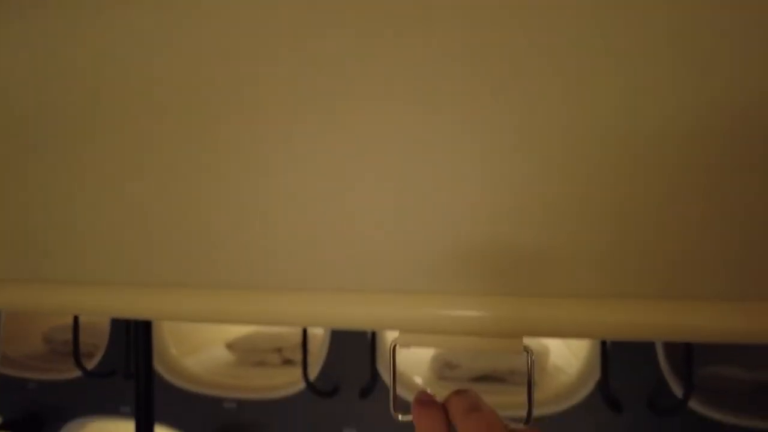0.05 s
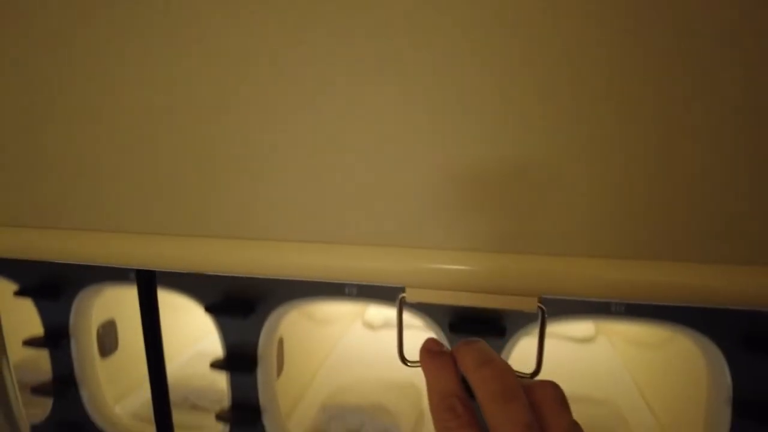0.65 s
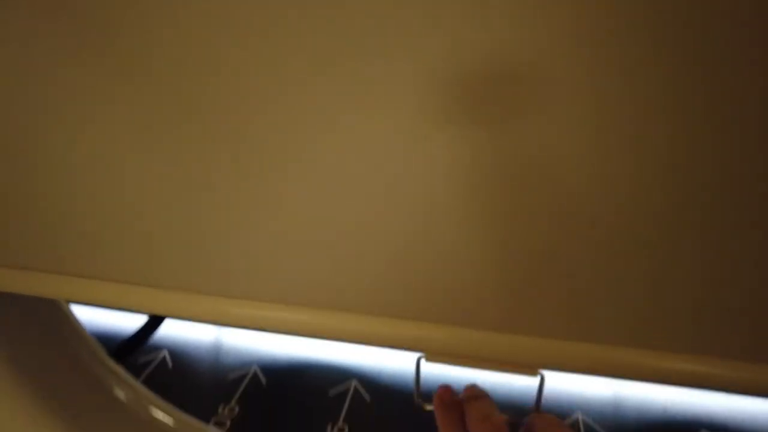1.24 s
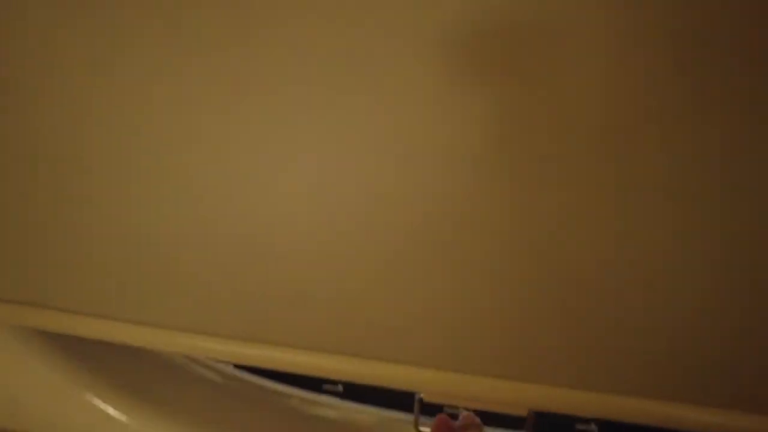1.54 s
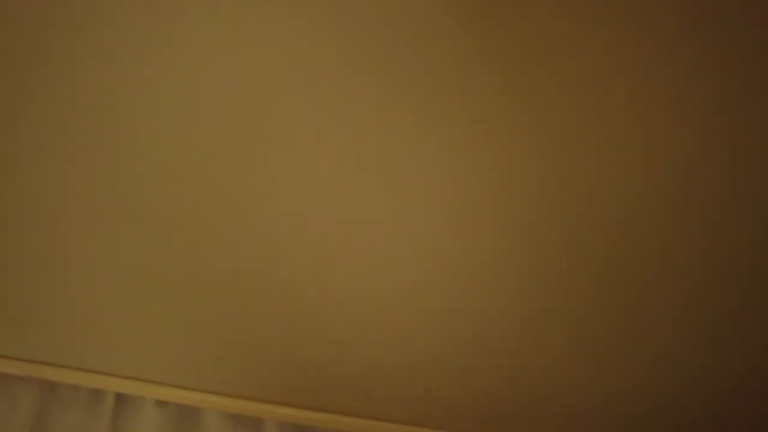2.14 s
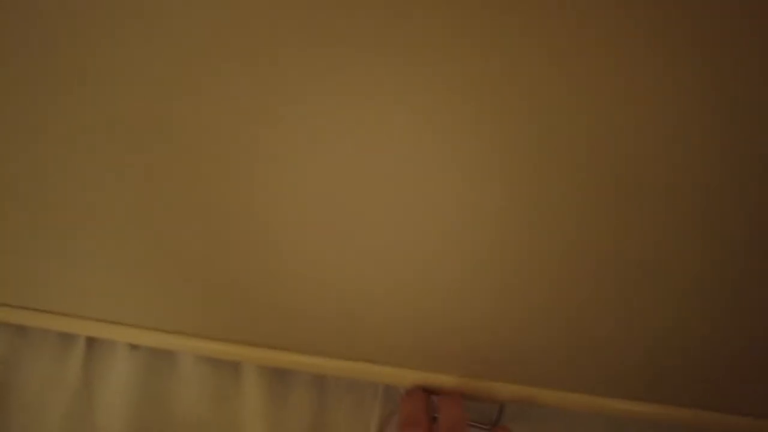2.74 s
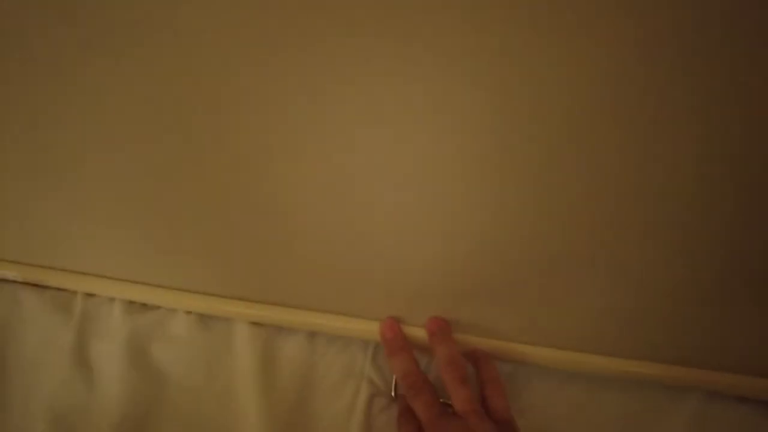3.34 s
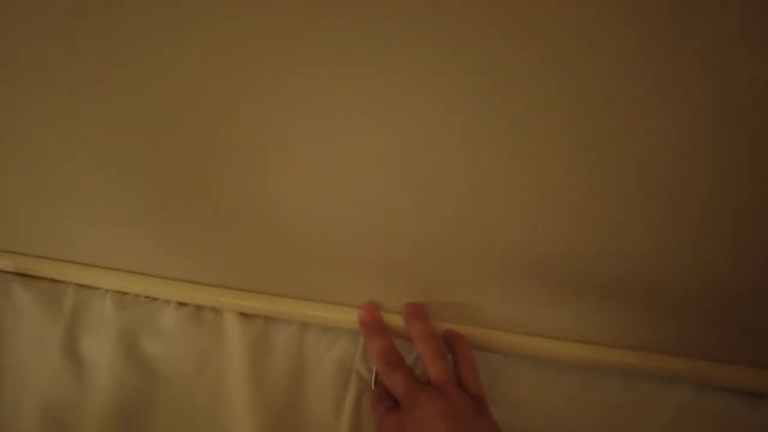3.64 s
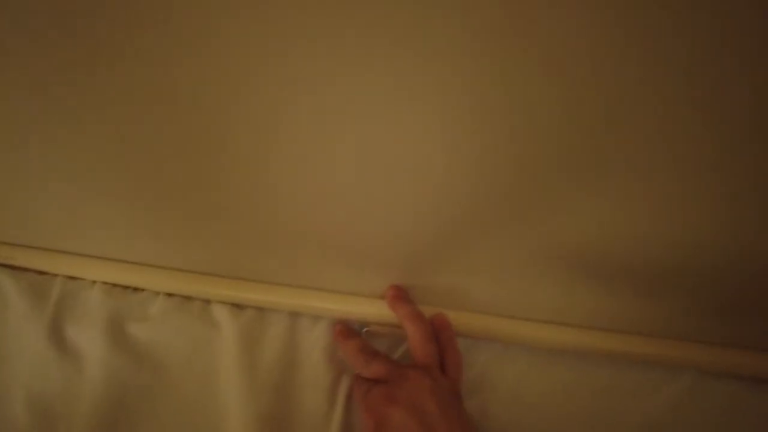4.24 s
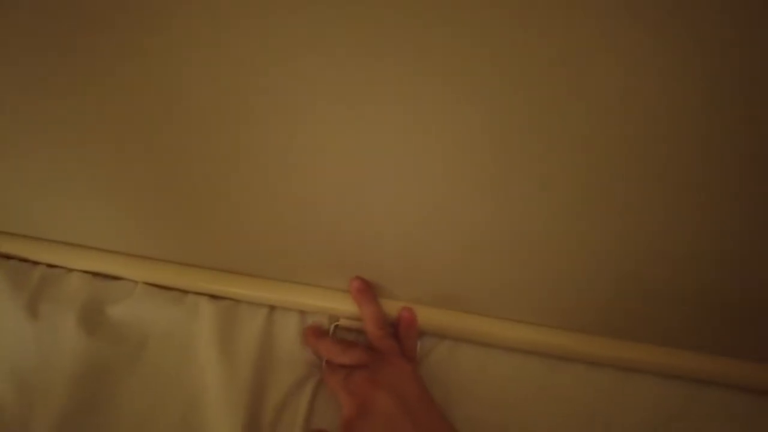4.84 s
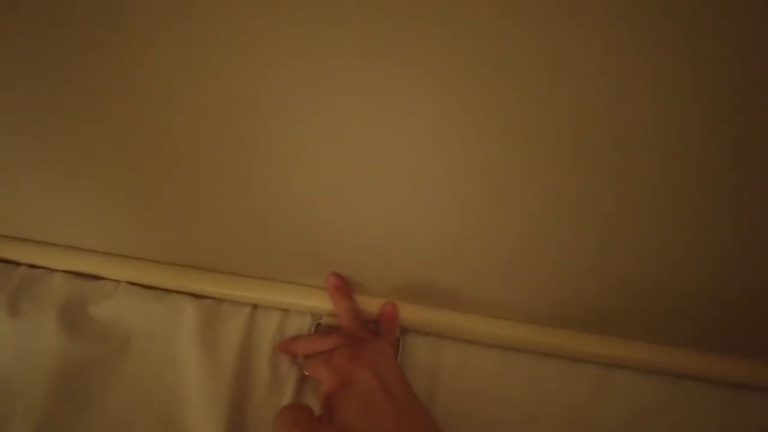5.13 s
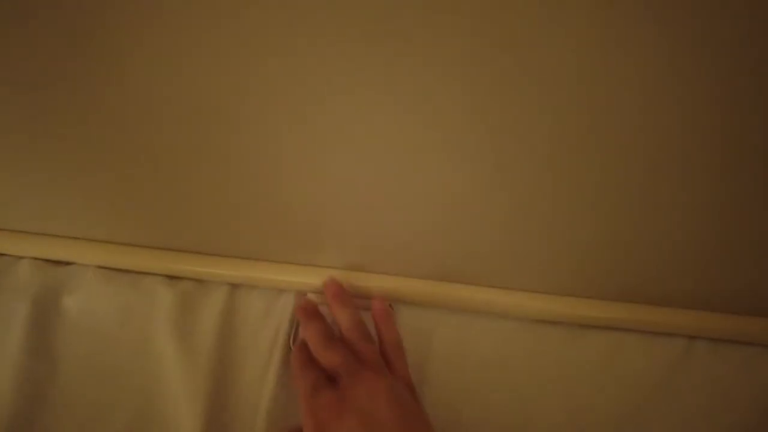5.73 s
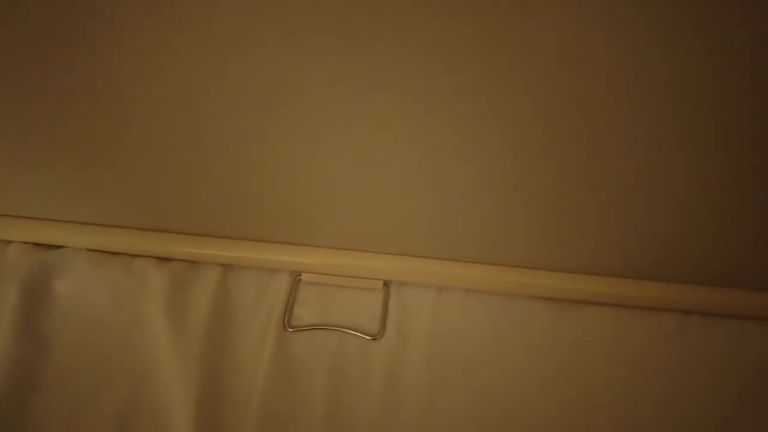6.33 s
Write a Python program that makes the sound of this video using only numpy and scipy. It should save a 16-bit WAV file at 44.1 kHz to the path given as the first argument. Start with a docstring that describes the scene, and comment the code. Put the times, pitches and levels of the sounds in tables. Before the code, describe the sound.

Close by in a small room, a blind unrolls, scraping and clacking, followed by several hollow knocks over a low rumble.

```python
"""A roller blind is pulled down by its wire handle, close by in a small cabin.
Stick-slip friction rings the hollow roller on every turn while the fabric hisses out. Then the bottom bar
knocks against the wall, exciting the modes of panel and bar, as fingers fumble with the handle.
Close walls reflect these sounds, and the moving sheet pumps the cabin air over a low rumble."""
import sys
import numpy as np
from scipy import signal
from scipy.fft import rfft, irfft, next_fast_len
from scipy.io import wavfile
from scipy.ndimage import uniform_filter1d

SR = 44100
rng = np.random.default_rng(int(sys.argv[2]) if len(sys.argv) > 2 else 0)


def dump(signal):
    """Clip the signal to [-1, 1] and save it as 16-bit WAV at the path in sys.argv[1]."""
    limited = np.clip(np.atleast_2d(signal).T, -1, 1)
    pcm = np.round(limited * 32767).astype(np.int16)
    wavfile.write(sys.argv[1], SR, pcm)


N = 281358
T = np.arange(N) / SR
AGE = T[:SR // 4]  # time since the onset of a short event [s]


def roller():
    """Friction and impact: the roller rubs, scrapes and clacks in its brackets as the fabric hisses off."""
    # scrapes, about once a turn: (time [s], level [dB], tilt [dB/octave], swell [s], fade [s])
    scrapes = [(0.035, -48, -4, 0.0063, 0.023), (0.234, -37.5, -10, 0.0101, 0.013),
               (0.28, -46, -28, 0.0077, 0.015), (0.416, -52, 1.5, 0.023, 0.02),
               (0.47, -42.5, -1.5, 0.0098, 0.015), (0.635, -49, -2, 0.013, 0.037),
               (0.72, -43, 1, 0.0088, 0.028), (0.886, -42.5, 1, 0.017, .035),
               (0.935, -40, 1.5, 0.016, 0.023), (1.052, -47, -0.5, 0.007, 0.024),
               (1.101, -43, -1, 0.015, 0.021), (1.262, -42.5, -2.5, 0.023, 0.048),
               (1.427, -47, -1, 0.0137, 0.017), (1.49, -42.5, -2.5, .01, 0.0083),
               (1.665, -46.5, -0.5, 0.039, 0.039), (1.938, -45.5, -1, 0.0094, 0.032),
               (2.131, -49, 1.5, 0.013, 0.019), (2.168, -44.5, -2, 0.00696, 0.0095),
               (2.635, -47, -4, 0.011, 0.015)]
    # drops against the brackets: (time [s], level [dB], tilt [dB/octave])
    clacks = [(.189, -40, -2), (.237, -34, -7), (.714, -41.5, 0), (.911, -39.5, -1), (1.11, -45.5, 1),
              (1.144, -51, 1.5), (1.291, -45.5, -1.5), (1.347, -43, -4.5), (1.49, -47.5, 0),
              (1.871, -41.5, -9), (2.169, -42, -2)]
    # spectrum of the running fabric: (frequency [Hz], level [dB])
    hiss_colour = [(400, -1), (1500, 8.5), (3000, -1.5), (5000, -1), (8000, -1.5), (11000, -7), (15500, -4)]
    rub_db, hiss_db = -61, -64.5  # at full speed
    moving = speed()
    rub = tube(pair(N, apart=0.5, grain_db=4), vary_db=0, tilt_db=0, detune=0)
    out = rub * moving * undb(rub_db + 2 * walk(30.15))
    for s, db, tilt_db, swell, fade in scrapes:
        add(out, s, scrape(db, tilt_db, swell, fade))
        add(out, s + swell / 2, shudder(db + 2.5 - 4 * s))  # weaker as the roll empties
    for s, db, tilt_db in clacks:
        add(out, s, clack(db, tilt_db))
    add(out, s=5.561, x=shudder(db=-36))  # a last shudder, of the fabric
    sheen = noise_band(10300 + 1500 * T, width_hz=2900) * undb(-72 - 5 * T)
    hiss = colour(pair(N, apart=0.65), hiss_colour) * undb(hiss_db + walk(11.3))
    return out + moving * (sheen + hiss)


def speed():
    """Motion of the blind: its speed follows the pull, then drops to zero."""
    # pull on the handle: (time [s], speed [share of full speed])
    pull = [(0.0, 0.65), (0.35, 0.73), (1.0, 1.0), (1.6, 0.79), (2.16, 0.66), (2.25, 0.3), (2.45, 0.26)]
    s, share = np.transpose(pull)
    return np.interp(T, s, share) * (T < s[-1])


def tube(force, vary_db, tilt_db, detune=0.036):
    """Resonance of the hollow roller: each place of contact weights and shifts its modes anew."""
    # roller resonances: (frequency [Hz], bandwidth [Hz], level [dB])
    modes = [(487, 136, 2), (692, 158, -5), (1016, 260, -12.5), (1355, 270, -6), (1668, 235, -8.5),
             (2160, 320, -15), (2630, 350, -17.5)]
    weights, shifts = rng.standard_normal((2, len(modes)))
    out = 0
    for weight, shift, (hz, width_hz, db) in zip(weights, shifts, modes):
        gain = undb(db + vary_db * weight + tilt_db * np.log2(hz))
        out += gain * resonate(force, hz * (1 + detune * shift), width_hz)
    return unit(out)


def scrape(db, tilt_db, swell, fade):
    """Stick-slip friction: an uneven run of slips swells and dies away, driving the roller."""
    force = np.minimum(AGE / swell, np.exp(np.minimum(swell - AGE, 0) / fade))
    uneven = undb(walk(153.7)[:len(AGE)])
    slips = pair(len(AGE), apart=0.6, grain_db=5) * force * uneven
    return burst(tube(slips, vary_db=3, tilt_db=tilt_db), db)


def clack(db, tilt_db):
    """Impact with play: the roller strikes its bracket once, then chatters briefly."""
    strike = blow(rise=0.00115, fade=0.0023)
    chatter = undb(-12.5) * blow(rise=0.0023, fade=0.018)
    force = pair(len(AGE), apart=0.6) * (strike + chatter)
    return burst(tube(force, vary_db=2, tilt_db=tilt_db), db)


def shudder(db):
    """Damped vibration: a dull, low shudder of the roll or the fabric."""
    # spectrum of the shudder: (frequency [Hz], level [dB])
    shudder_colour = [(90, -25), (175, 11.5), (270, 10), (400, 7), (600, -4.5), (1200, -42.5)]
    return scuff(shudder_colour, blow(0.0052, 0.029), db, apart=0.24)


def knocks():
    """Impact excites modes: the bar ticks on the wall, the panel thuds, both ring, the ends rattle."""
    # wall panel modes: (frequency [Hz], level [dB], T60 [s])
    panel_modes = [(161, -13, 0.3), (199.7, -2, 0.11), (251, -9.5, 0.27), (321, -7, 0.22), (391, -4, 0.16)]
    # free bar modes: (frequency [Hz], level [dB], T60 [s], change when held [dB])
    bar_modes = [(416, -10.5, 0.21, 1), (462, -7, 0.19, -2), (527.3, -9, 0.33, -0.5), (632, 2, 0.11, 6.5),
                 (701, 0.5, 0.072, -2), (772, -1, 0.18, -9), (911, -16, 0.11, 9), (1089, -23.5, 0.15, 16),
                 (1295, -11, 0.07, -13), (1460, -2.5, 0.066, -26), (1802, -0.5, 0.06, -23.5)]
    # spectrum of first contact: (frequency [Hz], level [dB])
    tick_colour = [(2000, -11), (3000, 6.5), (4700, 13), (5600, 0), (7200, 0.5), (10000, -4),
                   (15500, -28.5)]
    # spectrum of the bar's loose ends: (frequency [Hz], level [dB])
    rattle_colour = [(90, -6.5), (300, 1), (650, 12.5), (1000, -3), (1450, 4), (2100, -6), (2900, -6.5),
                     (4000, -31)]
    grip_s, held_t60_share, held_db_per_octave = 3.2, 0.76, -2.5
    contact, ends = np.zeros((2, 2, N))
    for s, db, hard_db, hz, length, ring_db in landings():
        held = s > grip_s  # fingers shorten the ring and dull the rattle
        modes = [(f, mode_db + held_db, t60 * held_t60_share) if held else (f, mode_db, t60)
                 for f, mode_db, t60, held_db in bar_modes]
        rattle = [(f, band_db + held * held_db_per_octave * np.log2(f)) for f, band_db in rattle_colour]
        bar_db = db - 14.5 + 0.12 * hard_db + ring_db
        tick_db = db - 30 + 0.94 * hard_db
        rattle_db = db - 19.5 + 0.5 * hard_db + ring_db / 2
        soft = undb(-hard_db)  # a soft blow takes longer to build up
        panel = burst(ring(panel_modes) * blow(length / 2, 0.23), db - 13.5)
        bar = burst(ring(modes) * blow(0.002, 0.12), bar_db)
        add(contact, s + 0.0012, burst(thud(hz, length), db) + panel + bar)
        tick_shape = blow(0.0003 * soft, 0.0058) + undb(-24) * blow(0.0017, 0.027)
        add(contact, s, scuff(tick_colour, tick_shape, tick_db, apart=0.53))
        add(ends, s, scuff(rattle, blow(0.0016 * soft, 0.018), rattle_db, apart=0.65))
    return from_right(contact) + ends  # contact lies to the right, the ends on both sides


def landings():
    """Inelastic rebound: each knock is followed by a weaker one."""
    # bar on wall: (time [s], level [dB], hardness [dB], thud pitch [Hz], thud length [s], bar ring [dB])
    impacts = [(2.386, -39, -5, 304, 0.021, -5), (2.788, -23, -6, 283, 0.015, 1.5),
               (2.882, -27.5, -9, 281, 0.016, 1.5), (2.919, -32.5, -6, 285, 0.016, -5),
               (3.028, -16.5, 3.5, 292, .014, 3), (3.065, -27.5, 7, 298, 0.016, 2.5),
               (3.651, -38, 6.5, 232, 0.0075, -0.5), (4.029, -20, -2.5, 278, .006, 5.5),
               (4.349, -32, -11, 258, 0.023, -4), (4.373, -25.5, -1, 273, 0.018, -1),
               (4.463, -32, -4, 289, 0.012, -1.5), (4.555, -20, -10, 284, 0.0123, 1.5),
               (4.865, -43.5, 16, 319, 0.014, 4), (5.122, -31.5, -6, 300, 0.02, -2),
               (5.26, -26.5, -12, 291, 0.015, -1), (5.348, -16, -7.5, 295, 0.013, -0.5),
               (5.386, -9, 3.5, 263, 0.0099, 0.5)]
    rebound_s = 0.031
    for s, db, hard_db, hz, length, ring_db in impacts:
        yield s, db, hard_db, hz, length, ring_db
        yield s + rebound_s, db - 22.5 + 0.42 * hard_db, hard_db, hz, length, ring_db


def thud(hz, length):
    """Forced vibration: the panel gives for a few cycles and stops as the bar leaves it."""
    return np.sin(np.pi * np.minimum(AGE / length, 1) ** 0.72) * np.sin(2 * np.pi * hz * AGE)


def ring(modes, count=3, spread=0.036):
    """Free vibration: close modes beat as they decay; each blow lands elsewhere and weights them anew."""
    chance = rng.standard_normal((len(modes), count, 3))
    out = 0
    for (hz, db, t60), cluster in zip(modes, chance):
        for weight, shift, phase in cluster:
            decay = undb(db + 2 * weight - 60 * AGE / t60)
            out += decay * np.sin(2 * np.pi * hz * (1 + spread * shift) * AGE + 2 * phase)
    return out


def from_right(x, delay_s=0.00034):
    """Path difference: sound from the right arrives later on the left."""
    return np.array([np.interp(T - delay_s, T, x[0]), x[1]])


def handle():
    """Light impacts: the wire handle clicks in its clip, which answers with a lower body."""
    # handle ticks: (time [s], body level [dB], click relative to body [dB])
    ticks = [(0.893, -38.5, -6), (0.9511, -43, 0.5), (3.186, -54, 4.5), (3.944, -38, -11),
             (3.954, -39.5, -3), (3.9624, -34.5, 0), (4.0017, -36, -24), (4.135, -60, 6), (5.238, -46, -21),
             (5.324, -40, -25), (5.726, -48.5, -11.5)]
    # spectrum of the wire: (frequency [Hz], level [dB])
    handle_colour = [(2000, 14), (4000, 7), (7500, 4), (10000, -10), (13500, -9), (16000, 6)]
    clip_colour = [(150, 3), (350, 8.5), (700, -3.5), (1000, -5), (1400, -1), (2100, -18.5), (3000, -20.5),
                   (6000, -32.5)]
    out = np.zeros((2, N))
    for s, db, click_db in ticks:
        add(out, s, scuff(handle_colour, blow(0.0004, 0.006), db + click_db, apart=0.9))
        add(out, s, scuff(clip_colour, blow(0.00045, 0.009), db, apart=0.44))
    return out


def fingers_and_swishes():
    """Sliding friction: fingertips squeak and slide over the fabric; faint swishes come and go besides."""
    # skin on bar and handle: (time [s], level [dB], pitch [Hz])
    squeaks = [(2.657, -52, 1640), (3.162, -56.5, 1850), (3.934, -53, 6430), (5.543, -48.5, 1720)]
    # narrow-band swishes, one swelling just before a knock: (start [s], end [s], level [dB], pitch [Hz])
    swishes = [(1.603, 2.015, -64.5, 1522), (2.42, 2.58, -64.5, 970), (3.001, 3.042, -52, 850),
               (3.385, 3.537, -67, 1557), (4.352, 4.415, -34.5, 290), (4.881, 4.965, -56, 1555)]
    # fingers on the fabric: (start [s], end [s], level [dB])
    slides = [(2.256, 2.732, -65.5), (2.852, 3.38, -68), (3.294, 4.005, -71), (4.323, 4.455, -48),
              (4.404, 4.61, -55), (4.895, 5.048, -58.5), (5.137, 5.462, -53.5), (5.446, 5.661, -57),
              (5.56, 6.293, -63.5)]
    # spectrum of the slides: (frequency [Hz], level [dB])
    slide_colour = [(200, 12), (500, 22), (1500, 18), (3000, 11.5), (5500, 4.5), (8000, 4), (11000, -3),
                    (15500, 3)]
    smear_hz, glide_hz_per_s = 380, 400
    out = np.zeros((2, N))
    for s, db, hz in squeaks:
        # skin slips unevenly, so its pitch is smeared
        line = [(hz / 2, -50), (hz - smear_hz, -18), (hz, 0), (hz + smear_hz, -18), (hz * 2, -50)]
        add(out, s, scuff(line, blow(0.004, 0.012), db, apart=0.23))
    for start, end, db, hz in swishes:
        pitch = hz + glide_hz_per_s * (np.clip(T, start, end) - (start + end) / 2)
        out += noise_band(pitch, width_hz=360) * stroke(start, end) * undb(db)
    pressure = sum(undb(db) * stroke(start, end) for start, end, db in slides)
    return out + colour(pair(N, apart=0.86, grain_db=4), slide_colour) * pressure


def stroke(start, end):
    """Asymmetric envelope: it builds up slowly and eases off faster."""
    peak = start + 0.69 * (end - start)
    return np.sin(np.pi / 2 * np.interp(T, [start, peak, end], [0, 1, 0])) ** 2


def cabin(x, early_t60_s=0.092, late_t60_s=0.62):
    """Reverberation: close walls reflect almost at once, and a weak, dull tail lingers."""
    # spectrum of the reflections: (frequency [Hz], level [dB])
    cabin_colour = [(60, 21.5), (300, -6), (700, -4), (2000, -3), (5000, -6), (15000, -23)]
    lag = T[:SR // 2]
    mid, side = colour(rng.standard_normal((2, len(lag))), cabin_colour)
    side = signal.sosfilt(signal.butter(2, 450, "high", fs=SR, output="sos"), side)  # bass stays centred
    echoes = mid + 0.94 * side * np.array([[1], [-1]])
    dull = signal.sosfilt(signal.butter(2, 1500, fs=SR, output="sos"), echoes)
    early = echoes * undb(-32.5 - 60 * lag / early_t60_s)
    late = dull * undb(-49.5 - 60 * lag / late_t60_s)
    return x + signal.oaconvolve(x, (early + late) * (lag > 0.008), axes=1)[:, :N]


def background():
    """Damped oscillation: low booms swell and die away over the cabin's rumble and faint hiss."""
    # low booms (the sheet's deep flaps, a dull bump, panel and cabin ringing after knocks):
    # (time [s], level [dB], frequency [Hz], time constant [s])
    booms = [(0.886, -44, 169, 0.048), (0.908, -27, 33.14, 0.06), (2.57, -35.5, 92, 0.011),
             (3.948, -29, 36.8, 0.073), (4.028, -39.5, 85, 0.03), (4.033, -44, 169, 0.037),
             (4.374, -19, 27.9, 0.025), (5.389, -39, 87.2, 0.051), (5.421, -22.5, 29.44, 0.064),
             (5.439, -41, 201, 0.025)]
    # spectrum of the rumble: (frequency [Hz], level [dB])
    rumble_colour = [(15, -19), (24, 2), (30, -2.5), (42, -3), (60, -16), (80, -15), (100, -12.5),
                     (125, -33), (170, -27), (260, -45), (500, -100)]
    # spectrum of the background hiss: (frequency [Hz], level [dB])
    air_colour = [(76, -43), (130, -9.5), (214, -21.5), (313, -6), (375, -14.5), (527, -18), (980, -29),
                  (1460, -25), (2230, -32.5), (4220, -35.5), (15500, -46.5)]
    rest_db, pull_db, press_db = -46.5, -42.5, -47  # press: while the fingers press on the bar
    stirred = undb(rest_db) + undb(pull_db) * speed() + undb(press_db) * stroke(2.3, 6.26)
    low = colour(pair(N, apart=0.04), rumble_colour) * stirred
    for s, db, hz, tau in booms:
        age = T[:SR]
        swing = age / tau * np.exp(1 - age / tau) * np.sin(2 * np.pi * hz * age)
        add(low, s, burst(swing, db))
    hiss = colour(pair(N, apart=0.58), air_colour) * undb(-63.5 + walk(4.31))
    return low * undb([[-1.3], [1.3]]) + hiss  # the bass leans right


def scuff(points, envelope, db, apart):
    """A short contact noise of given spectrum, envelope and level."""
    size = len(AGE) // 2
    return burst(colour(pair(size, apart), points) * envelope[:size], db)


def blow(rise, fade):
    """Envelope of a contact: exponential rise and decay, with time constants in seconds."""
    return (1 - np.exp(-AGE / rise)) * np.exp(-AGE / fade)


def resonate(x, hz, width_hz):
    """Two resonators in cascade give a peak with steep sides."""
    b, a = signal.iirpeak(hz, hz / width_hz, fs=SR)
    return signal.lfilter(b, a, signal.lfilter(b, a, x))


def noise_band(hz, width_hz):
    """Quadrature modulation shifts low-passed noise to a moving centre frequency."""
    smooth = signal.butter(2, width_hz / 2, fs=SR, output="sos")
    a, b = (signal.sosfilt(smooth, pair(N, apart=0.29)) for _ in range(2))
    phase = 2 * np.pi * np.cumsum(hz) / SR
    return unit(a * np.cos(phase) + b * np.sin(phase))


def colour(x, points):
    """Spectral shaping by (frequency [Hz], level [dB]) points; rms 1."""
    hz, db = np.transpose(points)
    size = next_fast_len(x.shape[-1])
    f = np.fft.rfftfreq(size, 1 / SR) + 1
    gain = undb(np.interp(np.log(f), np.log(hz), db))
    return unit(irfft(rfft(x, size) * gain, size)[..., :x.shape[-1]])


def pair(size, apart, grain_db=0):
    """Partly correlated left and right noise; grains of uneven level make it gritty."""
    mid, side = rng.standard_normal((2, size))
    grit = undb(grain_db * np.repeat(rng.standard_normal(size // 32 + 1), 32)[:size])
    return unit(grit * (mid + apart * side * np.array([[1], [-1]])))


def walk(rate_hz):
    """Smooth random fluctuation; rms 1."""
    step = int(SR / rate_hz)
    stairs = np.repeat(rng.standard_normal(N // step + 1), step)
    return unit(uniform_filter1d(stairs, step)[:N])


def burst(x, db):
    """Scale a short sound so that its loudest 6 ms have the given level."""
    return x * undb(db) / np.sqrt(uniform_filter1d(x ** 2, size=264, axis=-1).max())


def add(out, s, x):
    """Superpose x on out from time s on."""
    i = int(s * SR)
    out[..., i:i + x.shape[-1]] += x[..., :N - i]


def undb(db):
    """Decibels to gain."""
    return 10 ** (np.asarray(db) / 20)


def unit(x):
    """Scale to rms 1."""
    return x / np.sqrt(np.mean(x ** 2))


def scene():
    """Superposition: the close sounds reverberate in the cabin, over booms, rumble and hiss."""
    return cabin(knocks() + handle() + fingers_and_swishes() + roller()) + background()


def record(dry):
    """Band limiting: a steep low-pass removes the highest treble."""
    return signal.sosfilt(signal.ellip(10, 0.1, 80, 15850, fs=SR, output="sos"), dry)


dry = scene()
out = record(dry)
dump(out)
```